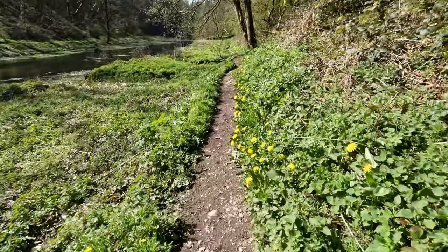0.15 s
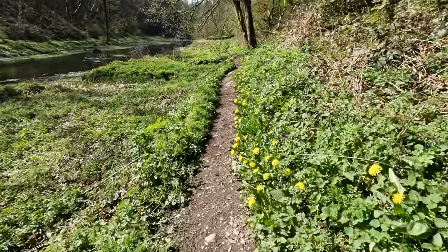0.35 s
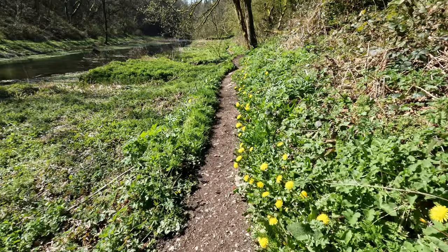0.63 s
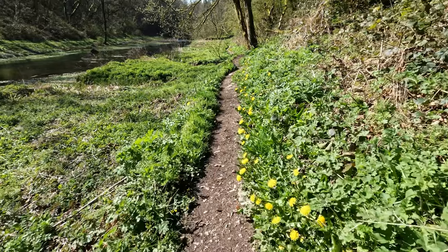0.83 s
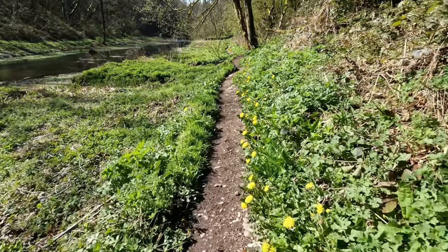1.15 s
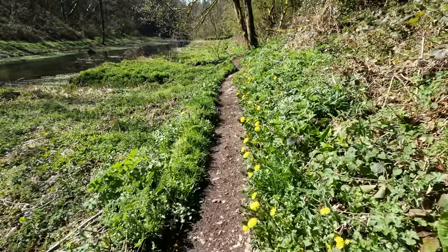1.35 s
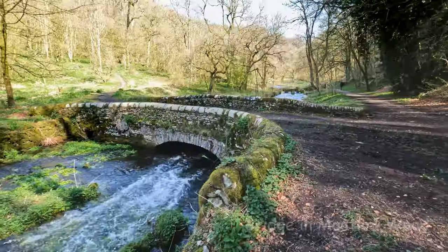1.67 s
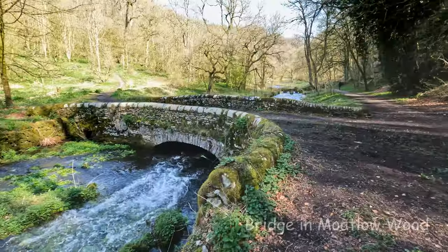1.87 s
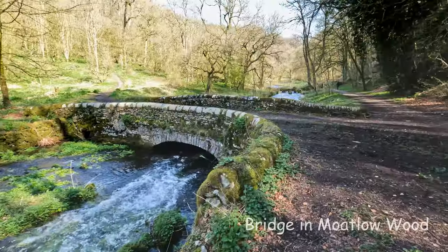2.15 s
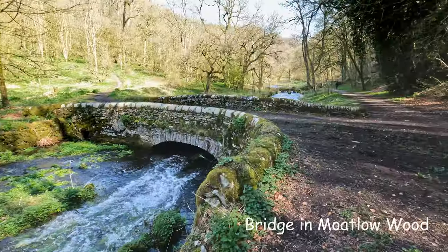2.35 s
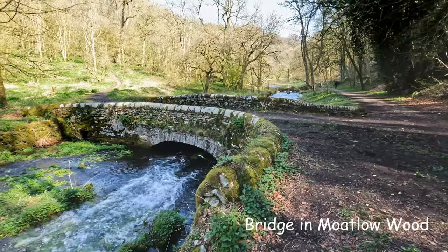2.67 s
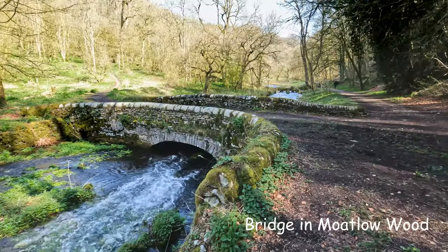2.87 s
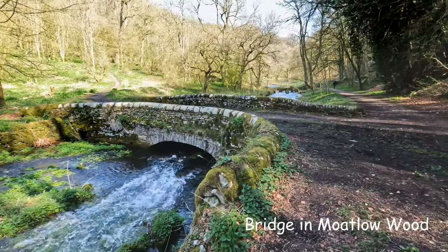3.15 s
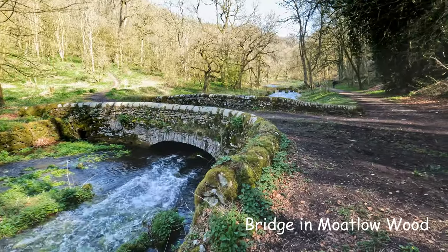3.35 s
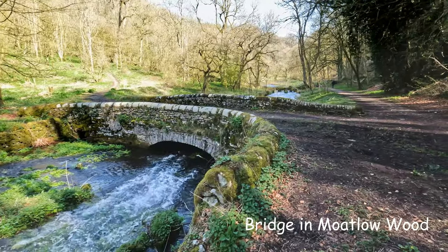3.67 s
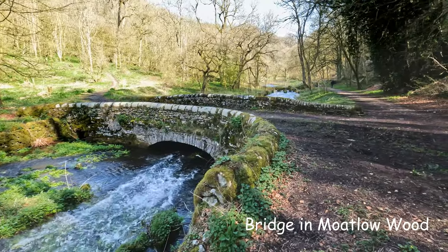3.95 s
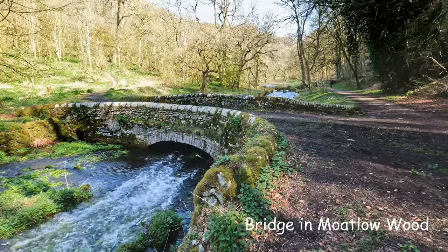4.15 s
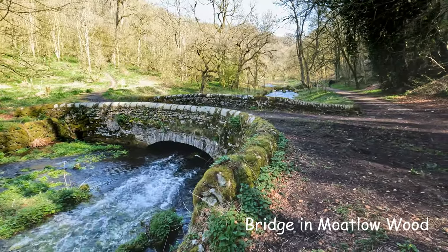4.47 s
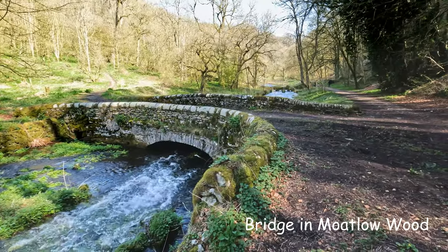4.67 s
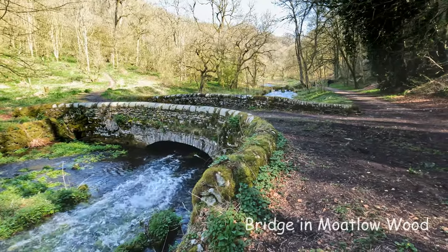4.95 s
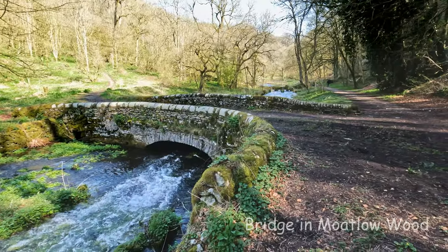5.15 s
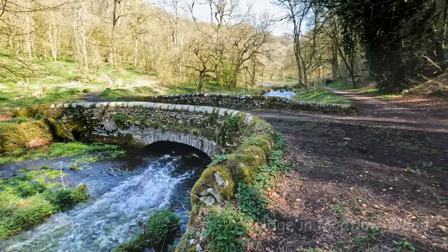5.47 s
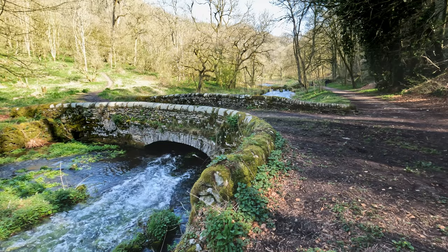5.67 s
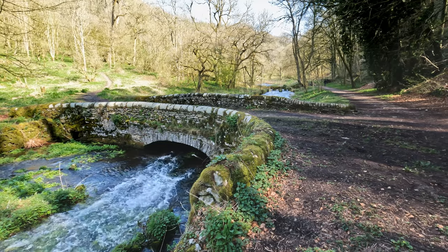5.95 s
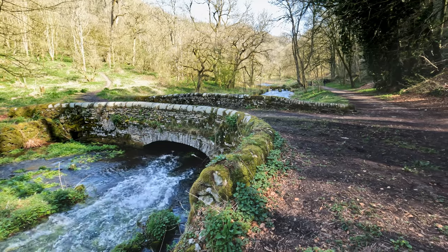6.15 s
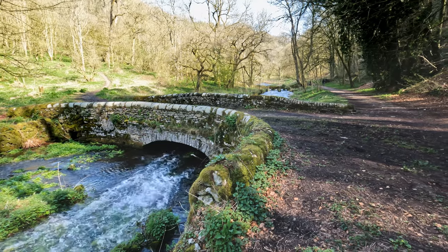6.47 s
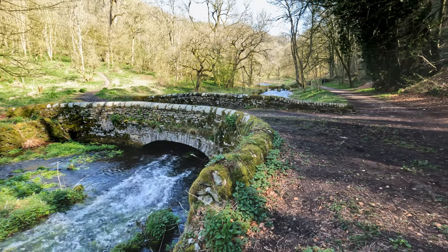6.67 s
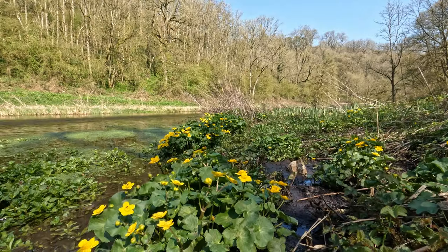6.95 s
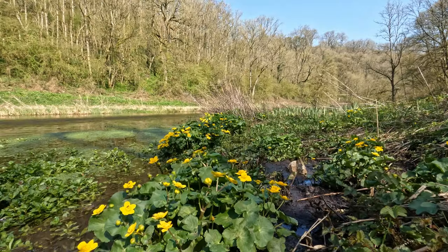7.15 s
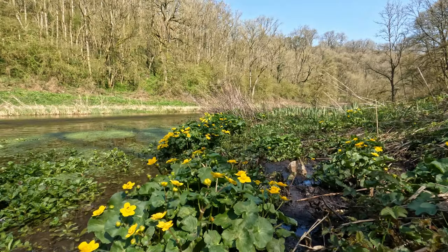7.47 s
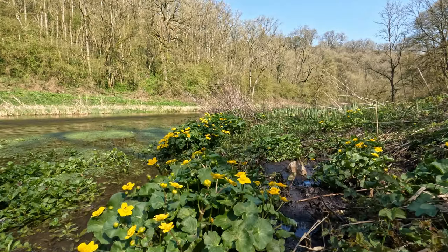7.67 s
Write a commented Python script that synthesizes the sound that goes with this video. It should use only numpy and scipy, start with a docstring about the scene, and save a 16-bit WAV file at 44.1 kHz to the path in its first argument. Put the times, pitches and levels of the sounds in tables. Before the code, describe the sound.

Soft river wash with bird chirps and mic thumps, then white water rushing under a stone bridge, then strong wind buffeting over a distant river.

```python
"""River walk in three spots.

A path by the water with small birds and a breeze on the microphone; a stone bridge where white water
rushes through the arch, fading in and out; then a calm bank, stiff wind over the distant river.
Water is coloured noise, with ringing bubbles and gulps at the bridge; wind is low rumble in gusts;
thumps are damped rebounds; birds are gliding sines; stem ticks are short noise bursts."""
import sys
import numpy as np
from scipy import signal
from scipy.fft import rfft, irfft, next_fast_len
from scipy.io import wavfile

SR = 44100
rng = np.random.default_rng(int(sys.argv[2]) if len(sys.argv) > 2 else 0)


def master(y):
    """Save y as 16-bit WAV."""
    cut = np.clip(np.atleast_2d(y).T, -1, 1)
    pcm = np.round(cut * 32767)  # scale
    wavfile.write(sys.argv[1], SR, pcm.astype(np.int16))


N = 344641
TIME = np.arange(N) / SR  # s
LEAVE_PATH_S, REACH_BANK_S = 1.428, 6.788


def white_water():
    """Foam and countless bubbles under the arch, surging together as the current tumbles."""
    # colour of the water: hz, relative_db
    water_colour = [(25, -26), (70, -17), (130, -12.5), (190, -9.5), (300, -7.5), (420, -2), (580, 0.5),
                    (1100, -1.8), (2000, -4.5), (4000, -10.5), (5600, -17.5), (8000, -33.5), (12300, -40.5),
                    (13500, -49)]
    # loudness of the rush before the spot fade: time_s, level_db
    flow = [(2.05, -27.5), (2.27, -28.5), (2.77, -27.5), (5.02, -27.5), (5.12, -28.5), (6.3, -28)]
    foam = churn(patchy_db=1.0, rate_hz=9.9)
    fizz = from_db(-5.0) * bubbles(per_s=6000, ring_cycles=12.4, spread_db=2.5)
    surge = from_db(0.35 * drift(10.0))
    rush = rms_one(coloured(foam + fizz, water_colour)) * surge
    gurgle = gulps(per_s=14, typical_db=-2.0, swell_s=0.0039, rise_per_s=1.64)
    return with_side(rush + gurgle) * from_db(in_time(flow))


def gulps(per_s, typical_db, swell_s, rise_per_s):
    """Large air pockets dragged under by the current: each swells, rises in pitch and dies away."""
    # largest gulps: start_s, pitch_hz (at onset), envelope_peak_db (re rush)
    large = [(3.010, 1310, -1), (3.580, 1260, 4), (3.912, 687, 2), (4.144, 765, 4.5), (4.263, 1055, 2.5)]
    draws = rng.random((int(per_s * N / SR), 3))
    chance = [(when * N / SR, 450 * 3 ** size, typical_db - 6 * depth) for when, size, depth in draws]
    age_s = np.arange(SR // 10) / SR
    swell = age_s / swell_s * np.exp(1 - age_s / swell_s)
    out = np.zeros(N + len(age_s))
    for start_s, pitch_hz, peak_db in large + chance:
        at = int(start_s * SR)
        tone = np.sin(2 * np.pi * pitch_hz * age_s * (1 + rise_per_s * age_s))
        out[at:at + len(age_s)] += from_db(peak_db) * swell * tone
    return out[:N]


def bubbles(per_s, ring_cycles, spread_db, count=36):
    """Trapped air rings for a few cycles; small bubbles outnumber large ones. Even power per Hz."""
    pitches_hz, out = np.geomspace(220, 8000, count), np.zeros(N)
    shares = np.sqrt(pitches_hz) / np.sum(np.sqrt(pitches_hz))
    for hz, share in zip(pitches_hz, shares):
        at = np.flatnonzero(rng.random(N) < per_s * share / SR)
        draw = rng.random((4000, 2))[np.arange(len(at)) % 4000]
        size_db = spread_db * np.minimum(-np.log(1 - draw[:, 0]), 4)
        clicks = np.full(N, 1e-18)
        clicks[at] = from_db(size_db) * np.sign(draw[:, 1] - .5)
        # 60 dB decay over ring_cycles
        r = from_db(-60 * hz / (max(ring_cycles, 2) * SR))
        w = 2 * np.pi * hz / SR
        ringing = signal.lfilter([1, 0, -1], [1, -2 * r * np.cos(w), r * r], clicks)
        out += np.sqrt(hz) * rms_one(ringing)
    return rms_one(out)


def churn(patchy_db, rate_hz):
    """White noise whose half-octave bands swell and sink on their own, as splashes come and go."""
    edges_hz, size = np.geomspace(150, 12000, 13), next_fast_len(N)
    band = np.searchsorted(edges_hz, np.arange(size // 2 + 1) * SR / size)
    white = rfft(rng.standard_normal(size))
    out = np.zeros(N)
    for k in np.unique(band):
        out += irfft(white * (band == k), size)[:N] * from_db(patchy_db * drift(rate_hz))
    return rms_one(out)


def far_river():
    """Distance blends the splashes into a smooth wash: one colour on the path, another on the bank."""
    # colour of the water from the path: hz, relative_db
    path_colour = [(60, -35), (250, -2), (400, -6.5), (600, -0.5), (900, 1.5), (1400, -1.5), (2000, -2),
                   (3000, -6), (4500, -12), (6000, -18.5), (8000, -33.5), (10500, -41.5), (13500, -48)]
    # colour of the water from the bank: hz, relative_db
    bank_colour = [(100, -3), (500, 2.5), (1000, 5), (1600, 2.5), (2300, 1), (3200, -4.5), (4200, -7.5),
                   (5500, -15.5), (7000, -22), (8500, -36), (10500, -36), (13500, -40)]
    wash = churn(patchy_db=0.57, rate_hz=10)
    path = with_side(rms_one(coloured(wash, path_colour))) * from_db(-37.5)
    bank = with_side(rms_one(coloured(wash, bank_colour))) * from_db(-42)
    # the bank starts 8 dB down
    bank_rise = np.interp(TIME, [REACH_BANK_S, REACH_BANK_S + 0.095], [from_db(-8), 1])
    return path, bank * bank_rise


def wind(steady_db, colour, lumpy_db):
    """Turbulence at the microphone port: a low rumble that arrives in lumps."""
    eddies = rng.standard_normal(N) * from_db(lumpy_db * drift(39))
    return rms_one(coloured(eddies, colour)) * wind_strength(steady_db)


def wind_strength(steady_db):
    """Gusts add power to the steady wind: each arrives quickly, sags as it blows, then dies away."""
    # gusts: start_s, length_s (until release), level_db (before sag)
    gusts = [(0.01, 0.39, -42), (1.03, .39, -43), (1.38, .04, -35), (1.72, 0.53, -48), (3.1, 0.33, -53),
             (3.48, 0.37, -53), (4.12, .1, -52), (4.903, 0.73, -45.5), (5.806, .55, -55),
             (6.772, 0.15, -23), (6.982, 0.067, -27.5), (7.1, 0.045, -21.5), (7.286, .115, -23.5),
             (7.465, .15, -27.5), (7.733, 0.091, -28.5)]
    attack_s, sag_db_per_s, release_s = 0.018, 7, 0.087
    power = from_db(steady_db) ** 2
    for start_s, length_s, level_db in gusts:
        age_s = np.maximum(TIME - start_s, 0)
        attack = np.minimum(age_s / attack_s, 1)
        release = np.exp(-np.maximum(age_s - length_s, 0) / release_s)
        gust = from_db(level_db - sag_db_per_s * age_s) * attack * release
        power = power + gust ** 2
    return np.sqrt(power)


def thumps(centre_hz, swell_s):
    """A lone eddy gives the microphone port one push and a quickly damped rebound."""
    # single eddies: start_s, envelope_peak_db
    eddies = [(0.054, -22), (0.081, -36), (0.759, -26.5), (0.840, -29.5), (0.919, -31), (1.420, -38)]
    out = np.zeros(N)
    for start_s, peak_db in eddies:
        age_s = np.clip(TIME - start_s, 0, .2)
        swell = age_s / swell_s * np.exp(1 - age_s / swell_s)
        pitch_hz = centre_hz * np.exp(0.16 * rng.standard_normal())
        out += from_db(peak_db) * swell * np.sin(2 * np.pi * pitch_hz * age_s)
    return out


def birds(warble_hz, flutter_db):
    """Three small birds, their thin whistles fluttering in strength and scattered by the trees."""
    # rising, warbled chirps by the path: start_s, level_db (before echoes and flutter)
    chirps = [(.005, -45), (.195, -52), (.398, -45.5)]
    # thin, gently arched peeps by the path: start_s, level_db (before echoes and flutter)
    peeps = [(.44, -61), (.53, -62), (.885, -61.5), (1.09, -63), (1.245, -60)]
    # faint falling slurs over the bank: start_s, level_db (before echoes and flutter)
    slurs = [(7.622, -67), (7.73, -66)]
    # note shapes: middle_ratio, end_ratio (pitch re start), warble_ratio (share of pitch)
    chirp_shape = (1.045, 1.19, .04)
    # same columns: middle_ratio, end_ratio, warble_ratio
    peep_shape = (1.01, .985, .004)
    # same columns: middle_ratio, end_ratio, warble_ratio
    slur_shape = (.89, 0.68, .004)
    song = whistles(chirps, 4800, 0.05, chirp_shape, warble_hz)
    song = song + whistles(peeps, 7050, 0.082, peep_shape, warble_hz)
    song = song + whistles(slurs, 8050, 0.1, slur_shape, warble_hz)
    lags_s = rng.uniform(.004, .06, size=6)
    echoes = from_db(-13) * sum(np.roll(song, int(lag_s * SR)) for lag_s in lags_s)
    return (song + echoes)[:N] * from_db(flutter_db * drift(60))


def whistles(notes, start_hz, length_s, shape, warble_hz):
    """One bird repeats its note: a sine gliding along an arc, with a fast warble."""
    middle, last, warble = shape
    u = np.linspace(0, 1, int(length_s * SR))
    glide_hz = start_hz * np.polyval(np.polyfit([0, .5, 1], [1, middle, last], 2), u)
    swell = np.sqrt(np.abs(np.sin(np.pi * u)))
    out = np.zeros(N + SR)
    for start_s, level_db in notes:
        warble_cycles = warble_hz * length_s * u + rng.random()
        hz = glide_hz * (1 + warble * np.sin(2 * np.pi * warble_cycles))
        at = max(int(start_s * SR), 0)
        out[at:at + len(u)] += from_db(level_db) * swell * np.sin(2 * np.pi * np.cumsum(hz) / SR)
    return out


def ticks(decay_s):
    """Dry stems snap against each other in the wind: band-passed noise, decaying at once."""
    # ticks in the plants on the bank: start_s, envelope_peak_db (before the band-pass)
    snaps = [(7.462, -57), (7.654, -53), (7.672, -60)]
    envelope = np.zeros(N)
    for start_s, peak_db in snaps:
        decay = np.exp(-np.clip((TIME - start_s) / decay_s, 0, 20))
        envelope += from_db(peak_db) * (TIME >= start_s) * decay
    band = signal.butter(2, [4000, 12000], "band", fs=SR, output="sos")
    return signal.sosfilt(band, envelope * rng.standard_normal(N))


def with_side(x):
    """Nearly mono: mid plus a faint side, strongest in the topmost hiss."""
    # side level re mid: hz, relative_db
    side_level = [(5000, -62), (10000, -18), (11200, -13), (12400, 3), (13500, -1)]
    # a half-second shift decorrelates side from mid
    side = coloured(np.roll(x, SR // 2), side_level)
    return x + side * np.array([[1], [-1]])


def coloured(x, spectrum):
    """Filter by a table of (Hz, dB), interpolated over log frequency."""
    size = next_fast_len(N + 4096)
    hz, level_db = np.transpose(spectrum)
    bins_hz = np.maximum(np.arange(size // 2 + 1) * SR / size, 1)
    gain = from_db(np.interp(np.log(bins_hz), np.log(hz), level_db))
    return irfft(rfft(x, size) * gain, size)[..., :N]


def drift(rate_hz):
    """Smooth chance with spread 1, changing about rate_hz times a second."""
    # two-pole low-pass at SR / 40; the first 2000 steps settle it
    r = np.exp(-80 * np.pi * rate_hz / SR)
    slow = signal.lfilter([1], [1, -2 * r, r * r], rng.standard_normal(N // 40 + 2002))[2000:]
    return np.interp(np.arange(N) / 40, np.arange(len(slow)), rms_one(slow))


def from_db(db):
    """Decibels to gain."""
    return 10 ** (np.asarray(db) / 20)


def rms_one(x):
    """Scale to unit power."""
    return x / np.sqrt(np.mean(x ** 2) + 1e-20)


def in_time(rows):
    """A curve joined by straight lines, one value a sample."""
    return np.interp(TIME, *np.transpose(rows))


def after(start_s):
    """Closed before the given moment, open 2 ms later."""
    return np.clip((TIME - start_s) / .002, 0, 1)


def scene():
    """Each spot is heard in its turn; the bridge fades in and out."""
    # wind rumble on the path: hz, relative_db
    breeze_colour = [(20, -11), (60, 5.5), (120, 1), (240, -2), (330, -9.5), (450, -24), (900, -45),
                     (3000, -80)]
    # wind rumble at the bridge: hz, relative_db
    eddy_colour = [(20, -13), (60, 1), (120, 0.5), (200, -6), (400, -29), (2000, -70)]
    # wind rumble on the bank: hz, relative_db
    gust_colour = [(20, -24), (60, -10.5), (100, -5), (165, 0), (230, -3.5), (310, -5.5), (400, -14),
                   (540, -21.5), (780, -33.5), (3000, -80.5)]
    fade_in_s, fade_out_s = 0.59, 0.45
    path, bank = far_river()
    path = path + wind(-52, breeze_colour, lumpy_db=1.8) + thumps(centre_hz=208, swell_s=0.0019)
    bridge = white_water() + wind(-66, eddy_colour, lumpy_db=4.0)
    bank = bank + wind(-33, gust_colour, lumpy_db=0.3) + ticks(decay_s=0.0018)
    fade_in = (TIME - LEAVE_PATH_S) / fade_in_s
    fade_out = (REACH_BANK_S - TIME) / fade_out_s
    fade = np.clip(np.minimum(fade_in, fade_out), 0, 1)
    song = birds(warble_hz=132, flutter_db=3.0)
    return path * (1 - after(LEAVE_PATH_S)) + bridge * fade + bank * after(REACH_BANK_S) + song


def record(dry):
    """The recorder has one narrow notch in the treble and a steep top cut."""
    notch_hz, cutoff_hz = 9050, 13500
    notched = signal.lfilter(*signal.iirnotch(notch_hz, 7, fs=SR), dry)
    top_cut = signal.ellip(10, .3, 80, cutoff_hz, fs=SR, output="sos")
    return signal.sosfilt(top_cut, notched)


dry = scene()
out = record(dry)
master(out)
```